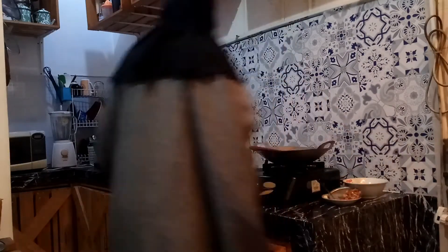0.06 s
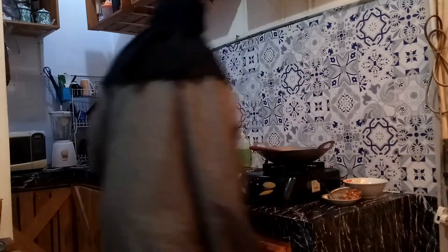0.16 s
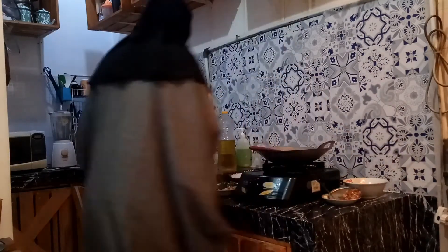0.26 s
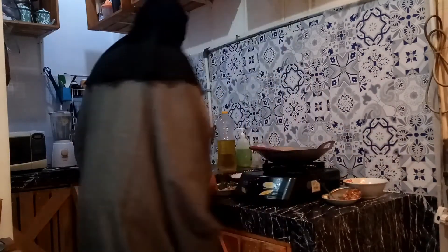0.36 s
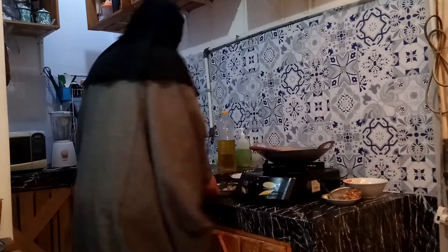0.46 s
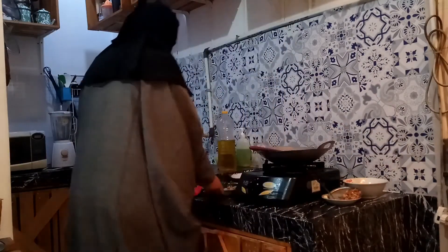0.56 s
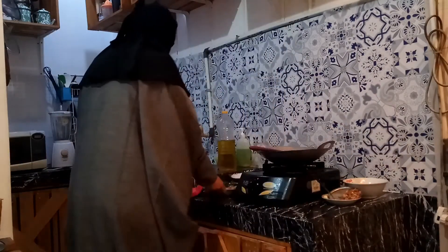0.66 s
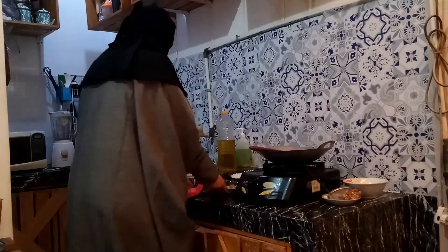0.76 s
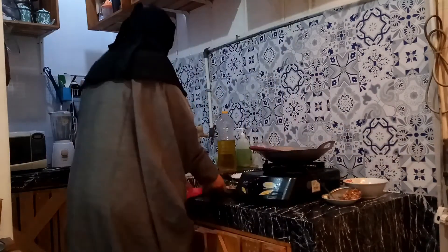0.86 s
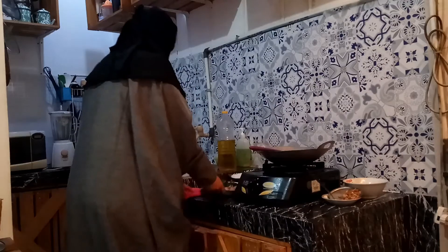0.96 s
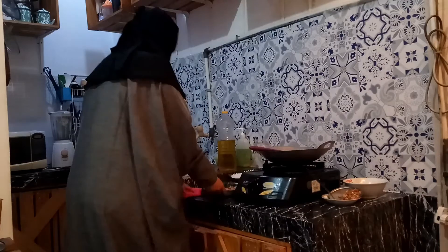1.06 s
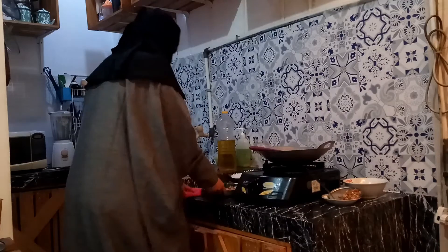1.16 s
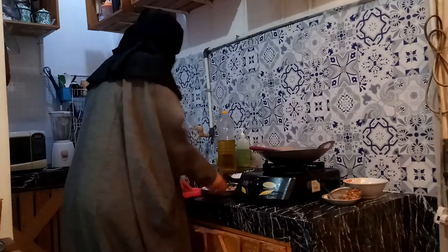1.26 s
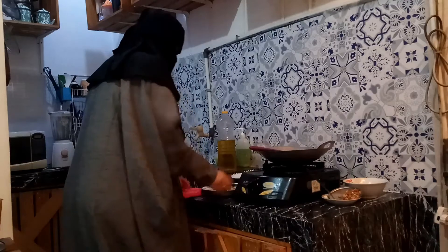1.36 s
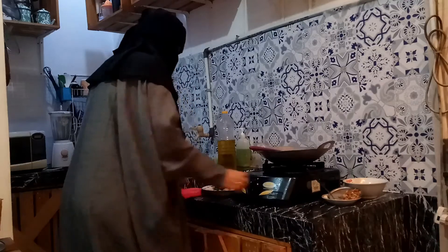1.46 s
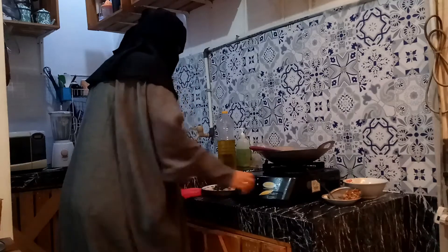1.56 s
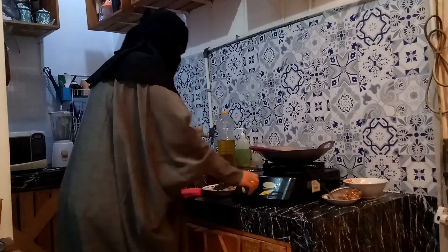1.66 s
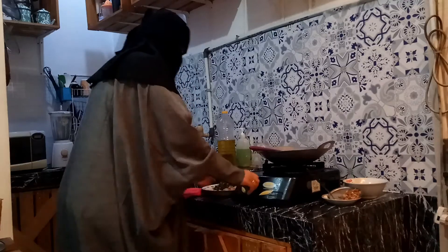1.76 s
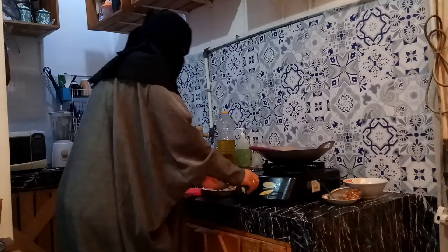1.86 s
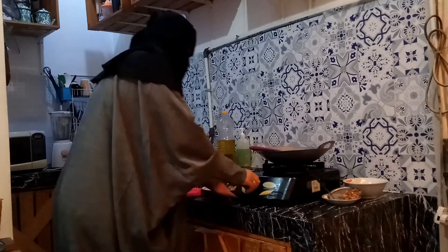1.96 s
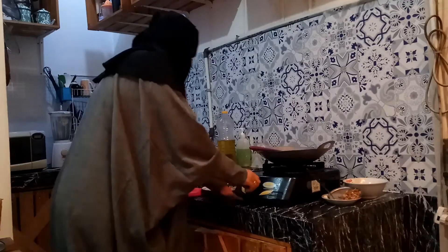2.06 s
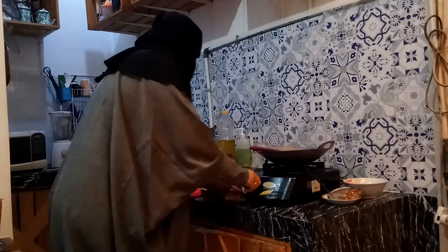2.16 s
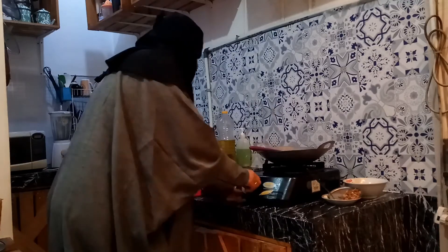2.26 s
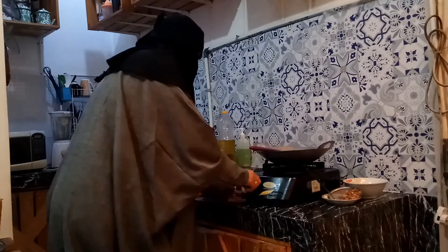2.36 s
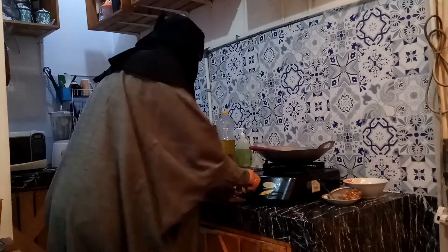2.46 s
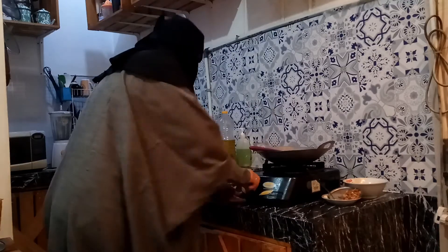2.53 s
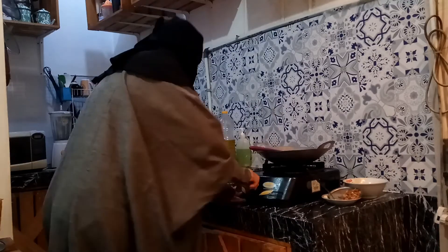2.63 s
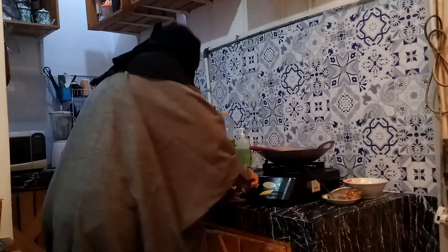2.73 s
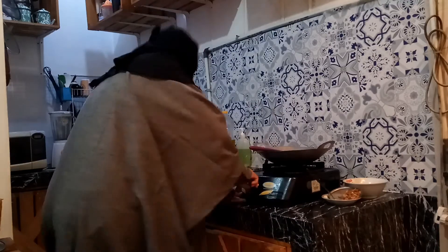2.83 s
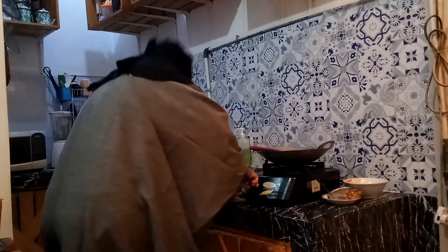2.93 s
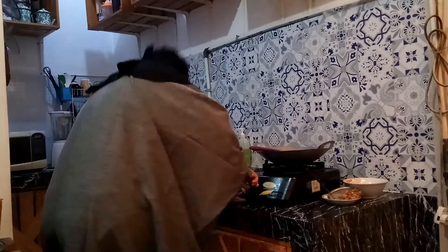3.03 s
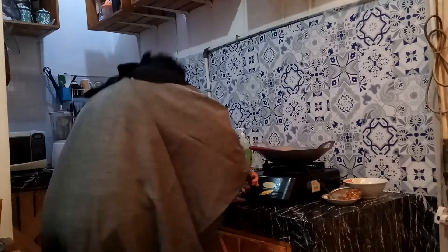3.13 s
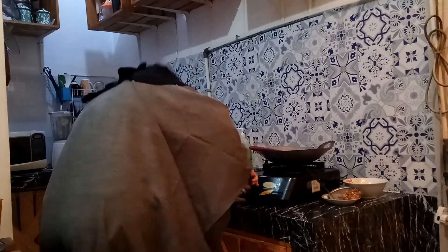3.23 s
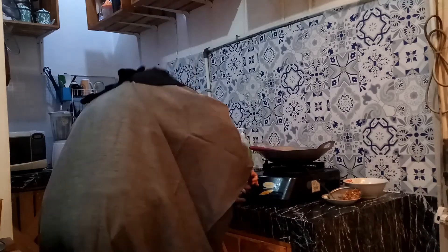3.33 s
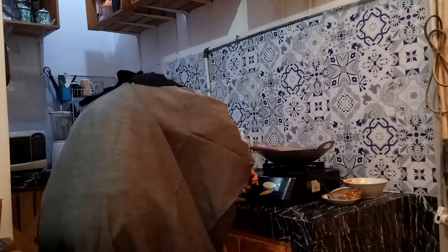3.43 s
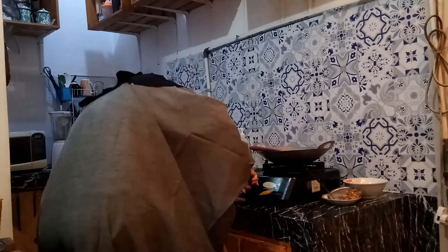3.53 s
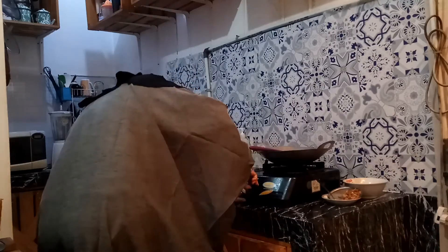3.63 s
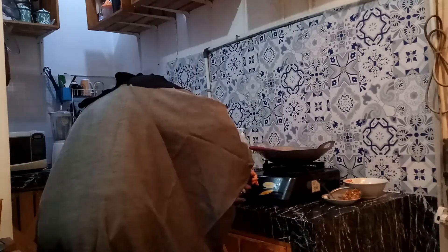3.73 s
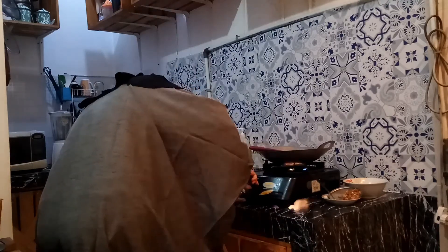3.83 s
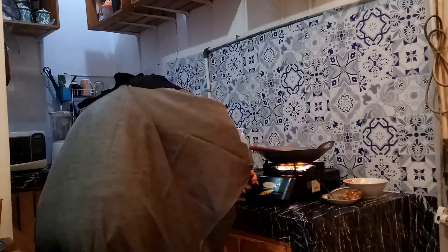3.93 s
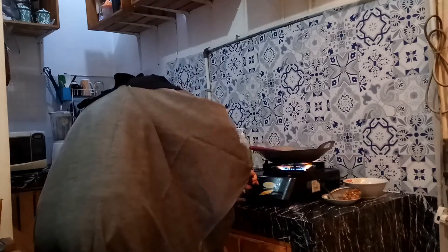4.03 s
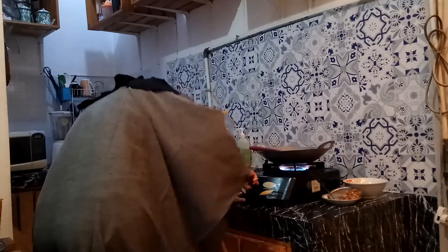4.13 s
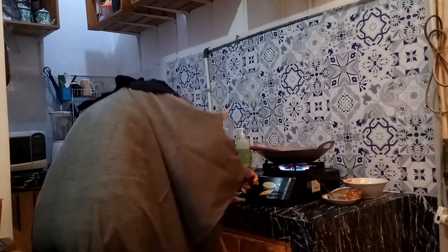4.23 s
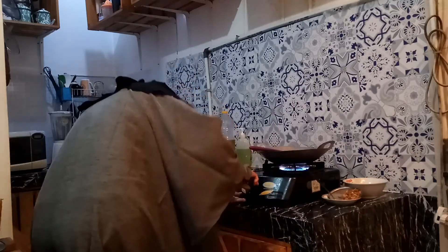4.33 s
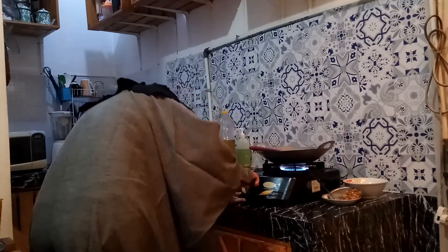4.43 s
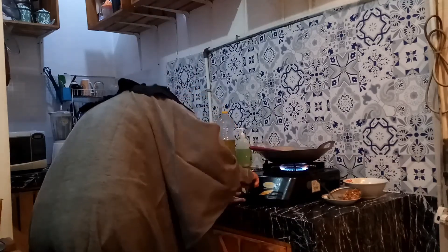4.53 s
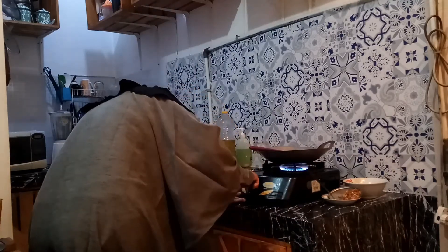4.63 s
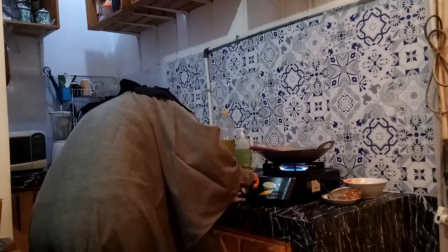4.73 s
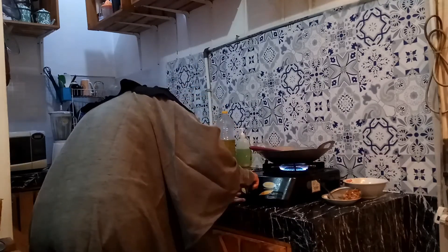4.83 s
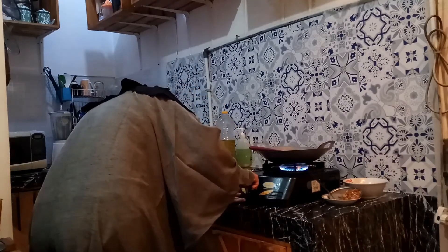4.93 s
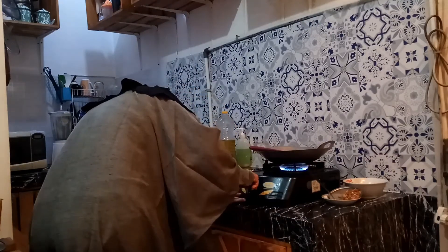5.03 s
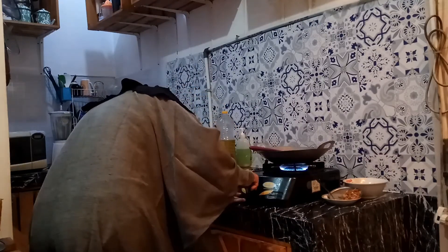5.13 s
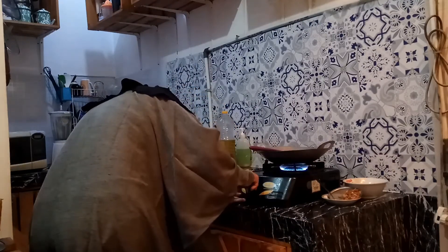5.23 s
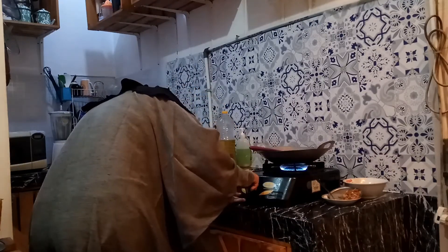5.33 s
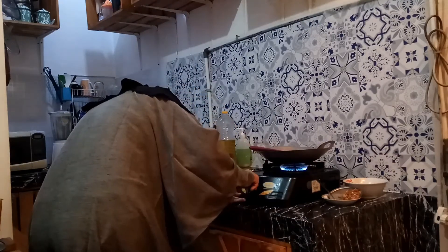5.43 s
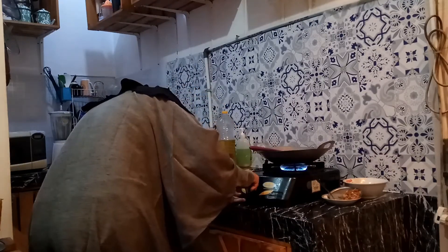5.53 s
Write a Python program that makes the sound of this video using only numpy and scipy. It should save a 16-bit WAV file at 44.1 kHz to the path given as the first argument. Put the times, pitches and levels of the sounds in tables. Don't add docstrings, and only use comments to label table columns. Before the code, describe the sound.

In a small tiled kitchen, soft shuffling and a ringing wok knock lead to a sharp stove igniter snap and a brief whooshing burst of gas.

```python
import sys
import numpy as np
from scipy import signal
from scipy.fft import rfft, irfft
from scipy.io import wavfile
from scipy.ndimage import map_coordinates

SR = 44100
rng = np.random.default_rng(int(sys.argv[2]) if len(sys.argv) > 2 else 0)


def store_pcm(level_fs):
    pcm = np.round(np.clip(level_fs, -1, 1) * 32767).astype(np.int16)
    wavfile.write(sys.argv[1], SR, np.atleast_2d(pcm).T)


def rack_gain(trim_db):
    fader = np.asarray(trim_db, float)
    return 10 ** (fader / 20)


N = 246166

# (t/s, peak level/dB, pan L-R/dB)
IGNITER_BLOWS = [
    (3.9320, -12, 0),
    (3.9350, -19, 0),
    (3.9408, -15.5, 0),
    (3.9455, -20, 0),
]
# (f/Hz, level/dB per Hz)
SNAP_COLOUR = [(88, -46), (150, -22.5), (400, -12.5), (586, -5), (733, -13), (917, 2), (1050, -8.5),
               (1700, -3.5), (2290, -6), (2610, 1), (3860, 0), (4830, -6), (5720, -1), (13000, 0.5)]
# (f/Hz, level/dB, t60/s)
STOVE_MODES = [(3204, -18, 0.085), (3350, -16, 0.16), (4253, -5, 0.04), (5150, -9.5, 0.13),
               (5600, -14.5, .15), (6420, -10, 0.13)]


def igniter():
    spring_s, spring_db, spring_hz = 3.9190, -18, 5000
    click = blows([(spring_s, spring_db, 0)])
    tick = resonance(click, spring_hz, 300) + .3 * resonance(click, 3 * spring_hz, 900)
    hammer = blows(IGNITER_BLOWS)
    blow = colour(hammer, SNAP_COLOUR) + rack_gain(43) * modes(hammer, STOVE_MODES, longest=.3)
    return tick + rack_gain(-6.0) * room(blow, direct_db=22)


# (t at full flow/s, hold/s, level/dB)
GAS_RUSH = [
    (3.961, 0.12, -26.5),
    (4.403, 0.0034, -61),
]
# (f/Hz, level/dB per Hz)
JET_COLOUR = [(290, -44.5), (500, -6), (1020, -9.5), (1390, -5), (1510, -14), (1660, -6), (2270, -10),
              (2980, -1.5), (3760, -6.5), (4190, -1), (4490, -3), (6940, -5.5), (13000, -14.5)]
# (t at full roar/s, hold/s, level/dB, swell/dB per s)
FLAME_PUFFS = [
    (3.954, 0.09, -40, 600),
    (4.108, 0.042, -30.5, 90),
    (4.19, 0.01, -45, 200),
    (4.242, 0.074, -37.5, 199.5),
    (4.37, 0.01, -68, 200),
    (4.435, 0.033, -65, 200),
]
# (f/Hz, level/dB per Hz)
ROAR_COLOUR = [(18, -52), (30, -36), (118, -0.5), (230, -1), (310, 0.5), (507, -5.5), (791, -12.5),
               (1130, -21), (1300, -17), (1800, -19), (2340, -33), (3960, -120)]


def flame():
    flow = joined(stroke(*row, swell_db=903.5, fade_db=139) for row in GAS_RUSH)
    flicker = rack_gain(.8 * drift(60))
    jet = flow * colour(pair(N), JET_COLOUR) * rack_gain(3.0) * flicker
    sparked = np.arange(N) > IGNITER_BLOWS[0][0] * SR
    puffs = joined(stroke(*row, fade_db=194) for row in FLAME_PUFFS) * sparked
    roar = puffs * colour(pair(N), ROAR_COLOUR) * rack_gain(-6 + 2.5 * drift(70))
    return jet + roar


# (t/s, peak level/dB, pan L-R/dB)
KNOB_CLICKS = [
    (4.4022, -46, 0.5),
    (4.425, -45, -2.5),
    (4.46, -53.5, -1),
]
# (f/Hz, level/dB per Hz)
KNOB_COLOUR = [(180, -41), (300, 0), (640, 0), (785, -9), (905, 0.5), (1010, -12), (1360, 1), (1550, -4.5),
               (1780, 0.5), (2730, 0), (3510, -15), (5910, -4), (8100, -22), (8900, -19), (13000, -30)]


def knob():
    return rack_gain(-5.5) * room(colour(blows(KNOB_CLICKS), KNOB_COLOUR), direct_db=12)


# (t/s, peak level/dB, pan L-R/dB)
WOK_HITS = [
    (1.2300, -59.5, 11),
    (1.2478, -26.5, -4),
    (1.2520, -67, -13),
    (1.2650, -57, 7),
    (1.2820, -42, 18),
    (1.3200, -42, 2),
]
# (f/Hz, level/dB per Hz)
WOK_CRACK = [(59, -80), (100, -38.5), (376, -13.5), (470, -6.5), (651, -4), (832, -8), (1080, -20.5),
             (1500, -11.5), (1800, -20.5), (2450, -19.5), (2940, -27), (13000, -37)]
# (f/Hz, level/dB, t60/s)
WOK_MODES = [(352, -15, 0.0073), (435, -6, 0.79), (728, 1.5, 0.062), (850, -3, 0.15), (920, -8, 0.22),
             (1300, -24, 0.53), (1367, -38, 0.74), (1350, -18, 0.36), (2000, -30, 0.18), (2220, -29, 0.076),
             (2150, -17.5, 0.86), (3720, -44, 0.21)]
# (t/s, level/dB, pan L-R/dB)
COUNTER_THUD = [
    (1.262, -28.5, 0),
]


def wok():
    hits = blows(WOK_HITS)
    crack = rack_gain(-5.0) * colour(hits, WOK_CRACK)
    ring = rack_gain(37.5) * modes(hits, WOK_MODES, longest=.04)
    thud_hz, thud_width = 101, 86
    thud = resonance(resonance(blows(COUNTER_THUD), thud_hz, thud_width), thud_hz, thud_width)
    return room(crack + ring + thud, direct_db=13)


# (t/s, peak level/dB, pan L-R/dB)
UTENSIL_TAPS = [
    (0.2138, -56.5, -13),
    (0.8987, -35, 5),
    (0.915, -35, -10),
    (0.940, -45, 15),
]
# (f/Hz, level/dB per Hz)
TAP_COLOUR = [(150, -68), (250, -19.5), (469, -13.5), (769, -14.5), (850, -9), (938, -16), (1110, -5.5),
              (1350, -12), (2450, -5.5), (2890, -12.5), (4220, -9), (13000, -21.5)]


def utensil():
    return rack_gain(-9) * room(colour(blows(UTENSIL_TAPS), TAP_COLOUR), direct_db=9)


# (t/s, peak level/dB, pan L-R/dB)
COUNTER_KNOCKS = [
    (1.072, -65, -5),
    (1.094, -59, -5),
    (1.112, -65, -5),
    (4.685, -60.5, 5),
    (2.577, -49.5, -3),
    (2.592, -44, 0),
    (2.622, -45, -1.5),
    (2.66, -52.5, -6),
]
# (f/Hz, level/dB per Hz)
KNOCK_COLOUR = [(71, -62), (120, 9), (141, -21), (351, 0.5), (553, -10), (637, 6), (759, -6), (921, 1),
                (1010, -6.5), (1800, -5), (2510, -15), (4720, -18.5), (8000, -54), (10400, -51),
                (17600, -120)]


def knocks():
    return rack_gain(-6) * room(colour(blows(COUNTER_KNOCKS), KNOCK_COLOUR), direct_db=2)


# (t at full pressure/s, hold/s, friction level/dB, swell/dB per s, top-octave sheen/dB)
SHUFFLE_STROKES = [(0.159, 0.068, -64, 403, -8), (0.29, 0.011, -64.5, 94, 3),
                   (0.326, 0.019, -46, 248, -7.5), (0.455, 0.082, -54, 300, -2),
                   (0.583, 0.026, -58.5, 400, -0.5), (0.673, 0.049, -58, 150, -2.5),
                   (0.777, 0.047, -57, 150, -4), (1.526, 0.0085, -63, 152, -6.5),
                   (1.765, 0.18, -71, 604, 12), (1.94, 0.012, -52.5, 190, -8),
                   (2.27, 0.03, -73.5, 100, -10), (2.586, 0.07, -70.5, 900, -8),
                   (2.665, 0.047, -66.5, 108, -33), (3.017, 0.093, -69.5, 300, 0),
                   (3.103, 0.028, -64, 97, -4.5), (3.222, 0.17, -75.5, 200, -4)]
# (f/Hz, level/dB per Hz)
SCUFF_COLOUR = [(410, -41), (700, -8), (735, -22), (831, -5), (927, -5), (1240, -20), (1390, -11),
                (2000, -1), (3430, 3), (6480, 2), (8070, -7), (13000, -2)]


def shuffle():
    grain = rack_gain(1.06 * np.minimum(rng.exponential(1, N), 5))
    rub = colour(rms_one(pair(N) * grain), SCUFF_COLOUR)
    top = signal.sosfiltfilt(signal.butter(2, 8000, "high", fs=SR, output="sos"), rub)
    gains = [stroke(*row[:4], fade_db=134.5) for row in SHUFFLE_STROKES]
    sheen = joined(gain * rack_gain(row[4] + 6.5) for gain, row in zip(gains, SHUFFLE_STROKES))
    pan_db = np.array([[.5], [-.5]]) * -1.5
    flutter = rack_gain(drift(45))
    return (joined(gains) * (rub - top) + sheen * top) * rack_gain(pan_db) * rack_gain(4.5) * flutter


# (t at full pressure/s, hold/s, level/dB)
HAND_STROKES = [(0.328, 0.01, -74), (0.535, 0.01, -81), (0.712, 0.01, -67.5), (1.084, 0.037, -55.5),
                (1.17, 0.024, -74), (1.727, 0.003, -69.5), (1.872, 0.038, -62.5), (2.057, 0.1, -72),
                (2.24, 0.082, -60.5), (2.508, 0.04, -70.5), (4.49, 0.14, -65), (4.684, 0.0094, -61.5)]
# (f/Hz, level/dB per Hz)
RUB_COLOUR = [(88, -43), (150, 0.5), (791, 2.5), (859, 3.5), (1180, -0.5), (1450, -13), (2200, -3.5),
              (3120, -67), (4000, -81), (5200, -63), (8800, -120)]


def rummage():
    press = joined(stroke(*row, swell_db=254, fade_db=111) for row in HAND_STROKES)
    return press * colour(pair(N), RUB_COLOUR) * rack_gain(-2.5 + 3.6 * drift(60))


# (t it sets in/s, level unlit/dB, level once lit/dB, creep once lit/dB per s)
WHISTLE_LEVELS = [
    (1.73, -75, -82.5, -2.5),
    (3.2, -72, -92, 8.5),
    (3.03, -73, -81.5, 11),
]
# (f/Hz, width/Hz)
WHISTLE_MODES = [(2650, 400), (5200, 900), (7700, 330)]
# (t/s, pitch factor)
WHISTLE_BEND = [(2.3, .8), (2.75, .9), (2.95, 1), (5.25, 1), (5.4, .97)]


def whistle():
    lit_s, swell_db = 4.46, 120
    t = np.arange(N) / SR
    read_at = np.cumsum(in_time(WHISTLE_BEND)[0])
    air, out = pair(N), 0
    for (hz, width), (s, unlit_db, lit_db, creep_db) in zip(WHISTLE_MODES, WHISTLE_LEVELS):
        db = np.where(t < GAS_RUSH[0][0], unlit_db, lit_db + creep_db * np.maximum(t - lit_s, 0))
        db = db - swell_db * np.maximum(s - t, 0)
        tone = rms_one(resonance(resonance(air, hz, width), hz, width))
        bent = np.array([map_coordinates(side, [read_at], order=3) for side in tone])
        out = out + rack_gain(db + 0.54 * drift(10.0)) * bent
    return out


# (f/Hz, width/Hz, level/dB)
HUM = [(61.8, 13.9, -85), (116, 26.6, -69), (196.7, 27, -77), (256.5, 7.4, -79.5), (317.5, 30, -83)]
# (f/Hz, level/dB per Hz)
RUMBLE = [(13, -52.5), (22, -18), (54, -24.5), (114, -17.5), (161, -2.5), (265, -10.5), (318, -21.5),
          (391, -12), (600, -12), (780, -52), (1320, -120)]
# (f/Hz, level/dB per Hz)
HISS = [(350, -27.5), (600, -0.5), (748, -3.5), (909, -4.5), (1810, -5.5), (2170, -5), (2320, -5.5),
        (2540, -3.5), (2710, -8.5), (3850, -9.5), (4740, -10), (5760, -9.5), (7560, -17), (8840, -18.5),
        (13400, -14)]
# (f/Hz, L-R/dB)
HISS_PAN = [(60, -7.5), (240, 21), (950, -2.5), (3770, -3.5), (15000, 1.5)]


def background():
    rumble_db, hiss_db = -72.5, -71
    air = pair(N)
    hum = sum(rack_gain(db) * rms_one(resonance(air, hz, width)) for hz, width, db in HUM)
    hiss = pan_by_band(colour(pair(N), HISS), HISS_PAN)
    rumble = rack_gain(rumble_db - 5.0 + 0.87 * drift(4.8)) * colour(pair(N), RUMBLE)
    return rack_gain(hiss_db + 2.5 + 0.2 * drift(11.0)) * hiss + rumble + hum


# (f/Hz, t60/s)
ROOM_T60 = [(100, 0.58), (500, 0.38), (2000, 0.45), (6000, 0.34), (16000, 0.37)]


def room(x, direct_db):
    build_s, early_s, early_db = 0.017, 0.016, 4
    size = SR
    t, hz = np.arange(size) / SR, np.fft.rfftfreq(size, 1 / SR)
    spread, echo = rfft(pair(size)), 0
    for centre in 62.5 * 2. ** np.arange(9):
        share = np.clip(1 - abs(np.log2((hz + 1) / centre)), 0, 1)
        band = irfft(spread * share, size) * rack_gain(-60 * t / at_hz(ROOM_T60, centre))
        power = np.sum(band ** 2, axis=1, keepdims=True)
        echo = echo + band * np.sqrt(power.mean() / power)
    echo *= 1 - np.exp(-t / build_s) + rack_gain(early_db) * np.exp(-t / early_s) * (t > .0012)
    echo[:, 0] = rack_gain(direct_db)
    return signal.fftconvolve(x, echo, axes=1)[:, :N]


# (f/Hz, left-right likeness)
LIKENESS = [(60, 0.85), (150, 0.94), (380, 0.79), (950, 0.028), (2380, 0.025), (5980, 0.01), (15000, 0.051)]


def pair(size):
    mid, side = rfft(rng.standard_normal((2, size)))
    alike = np.clip(at_hz(LIKENESS, np.fft.rfftfreq(size, 1 / SR)), -.99, .99)
    both = np.sqrt(1 + alike) * mid + np.sqrt(1 - alike) * side * [[1], [-1]]
    return irfft(both, size) / np.sqrt(2)


def rms_one(x):
    return x / np.sqrt(np.mean(x ** 2) + 1e-20)


def in_time(rows):
    s, *columns = np.transpose(rows)
    return [np.interp(np.arange(N) / SR, s, c) for c in columns]


def at_hz(points, hz):
    table = np.array(points)
    return np.interp(np.log(hz + 1), np.log(table[:, 0]), table[:, 1])


def drift(rate):
    steps = rng.standard_normal(int(N / SR * 400))
    knots = np.arange(len(steps)) * SR / rate
    return np.interp(np.arange(N), knots, steps)


def colour(x, gain_db, even=True):
    source_top_hz = 11100
    hz = np.fft.rfftfreq(8192, 1 / SR)
    if even:
        hz = np.minimum(hz, source_top_hz)
    cepstrum = irfft(np.log(rack_gain(at_hz(gain_db, hz))))
    cepstrum[1:4096] *= 2
    cepstrum[4097:] = 0
    pulse = irfft(np.exp(rfft(cepstrum)))
    if even:
        pulse /= np.sqrt(np.sum(pulse ** 2))
    return signal.fftconvolve(np.atleast_2d(x), pulse[None], axes=1)[:, :x.shape[-1]]


def resonance(x, hz, width):
    r = np.exp(-np.pi * width / SR)
    zeros = np.array([1, 0, -1]) * (1 - r * r) / 2
    return signal.lfilter(zeros, [1, -2 * r * np.cos(2 * np.pi * hz / SR), r * r], x)


def modes(hits, table, longest):
    out = 0
    for hz, db, t60 in table:
        t60 = min(t60, longest)
        out = out + rack_gain(db) * t60 * resonance(hits, hz, np.log(1000) / np.pi / t60)
    return out


def blows(rows):
    out = np.zeros((2, N))
    for s, db, pan_db in rows:
        out[:, round(s * SR)] = rack_gain(db + np.array([.5, -.5]) * pan_db)
    return out


def stroke(s, hold, db, swell_db, fade_db):
    t = np.arange(N) / SR
    return rack_gain(db - swell_db * np.clip(s - t, 0, 1) - fade_db * np.clip(t - s - hold, 0, 1))


def joined(gains):
    return np.sqrt(sum(gain ** 2 for gain in gains))


def pan_by_band(x, table):
    tilts = [[(hz, sign * db / 2) for hz, db in table] for sign in (1, -1)]
    return np.array([colour(side, tilt, even=False)[0] for side, tilt in zip(x, tilts)])


def scene():
    stove = igniter() + flame() + knob()
    handling = wok() + utensil() + knocks() + shuffle() + rummage()
    return stove + handling + whistle() + background()


# (f/Hz, level/dB)
PORT_PEAK = [(12000, -0.85), (13800, -5), (14500, 11), (15200, 3.5), (15700, 1.5)]
# (f/Hz, L-R/dB)
PORT_PAN = [(5000, 0.34), (9000, 2.5), (13000, 6), (15000, -5)]
# (f/Hz, level/dB per Hz)
SELF_NOISE = [(11000, -37.5), (13600, -21), (14400, 0.5), (15100, 8), (15800, -1)]


def microphones(dry):
    noise_db, noise_pan_db, overload = -46.5, -19.5, .75
    noise_gain = rack_gain(noise_db + np.array([[.5], [-.5]]) * noise_pan_db)
    hiss = colour(noise_gain * rng.standard_normal((2, N)), SELF_NOISE, even=False) * rack_gain(-17.0)
    ported = pan_by_band(colour(dry, PORT_PEAK, even=False), PORT_PAN) + hiss
    return overload * np.tanh(ported / overload)


def band_limit(x):
    return signal.sosfilt(signal.butter(12, 16830, fs=SR, output="sos"), x)


def record(dry):
    low_pass = signal.cheby2(16, 50, 15850, fs=SR, output="sos")
    mix = signal.sosfilt(low_pass, microphones(dry))
    return band_limit(mix)


dry = scene()
out = record(dry)
store_pcm(out)
```